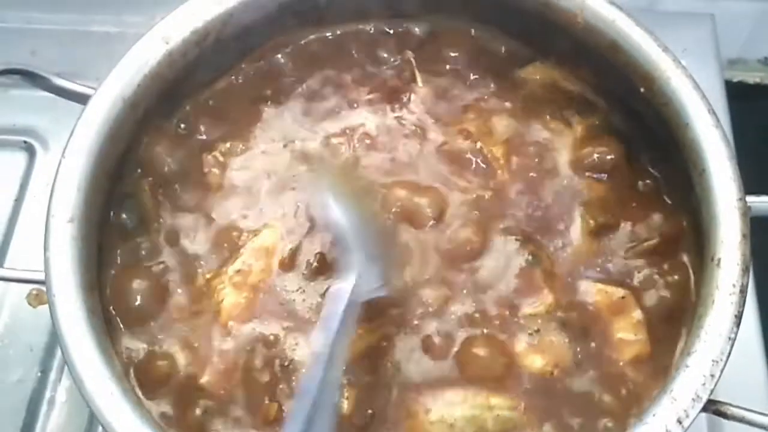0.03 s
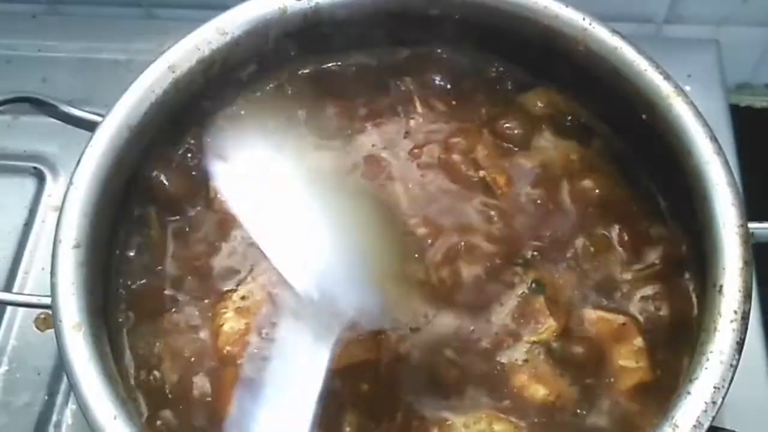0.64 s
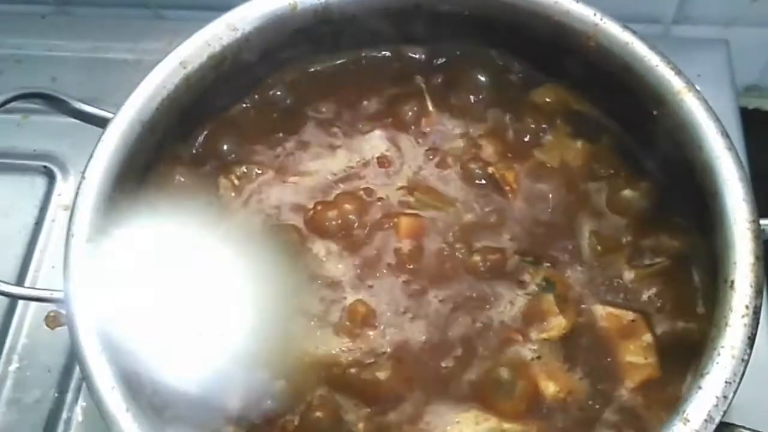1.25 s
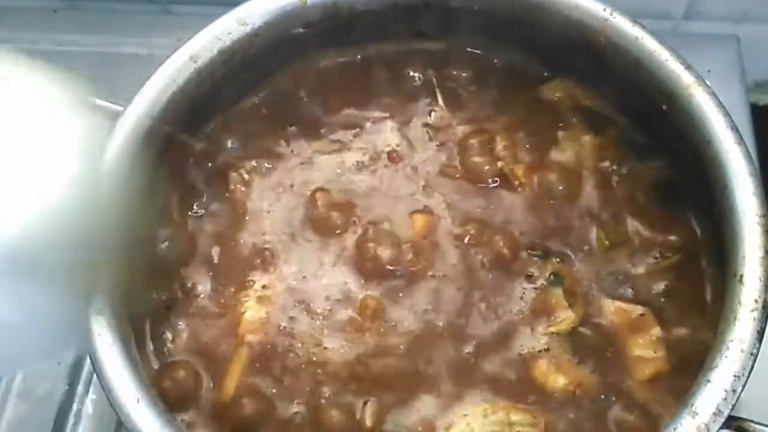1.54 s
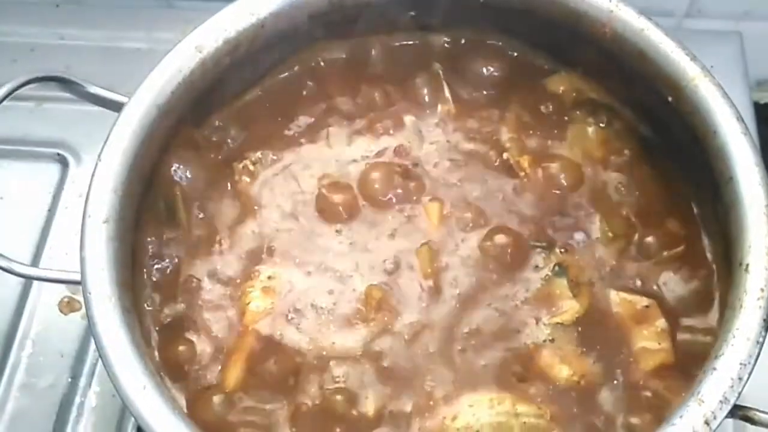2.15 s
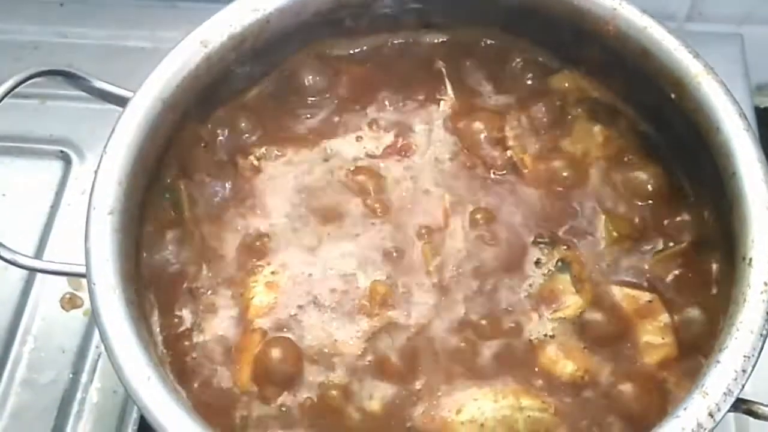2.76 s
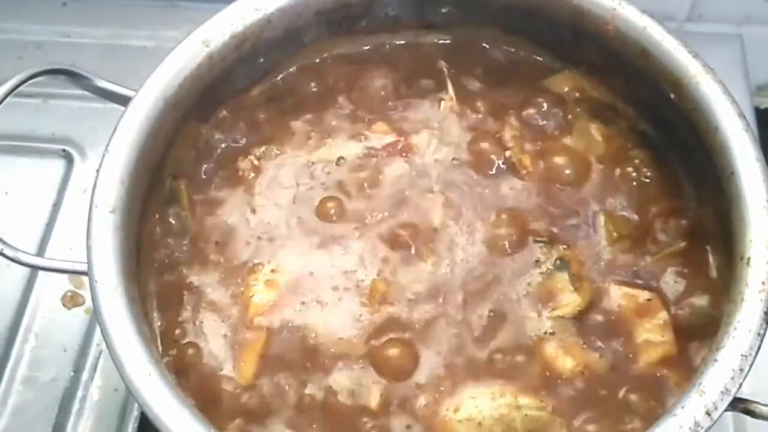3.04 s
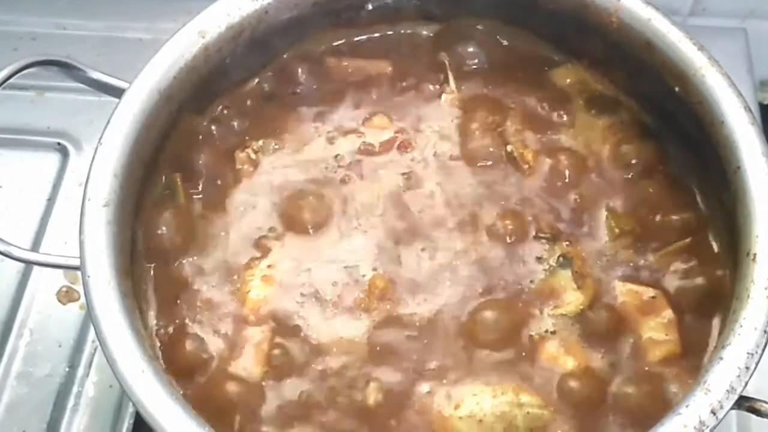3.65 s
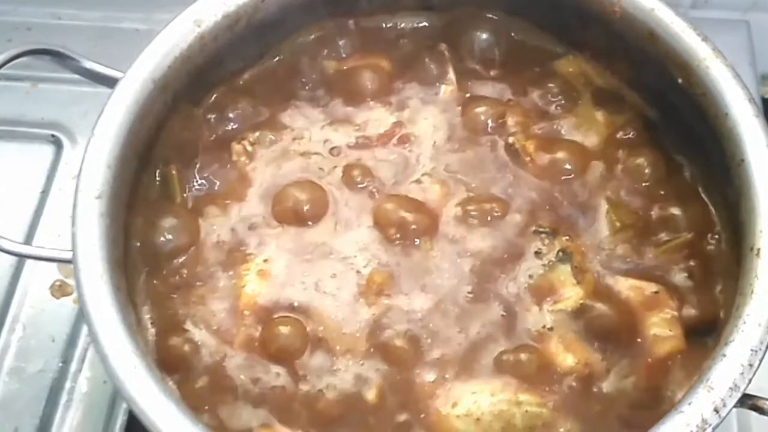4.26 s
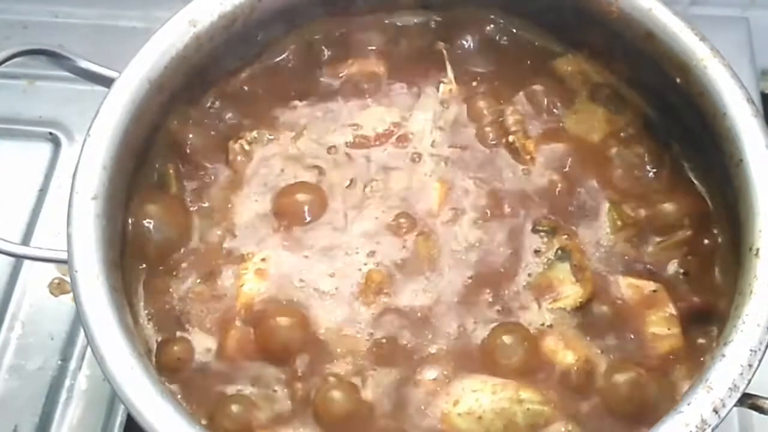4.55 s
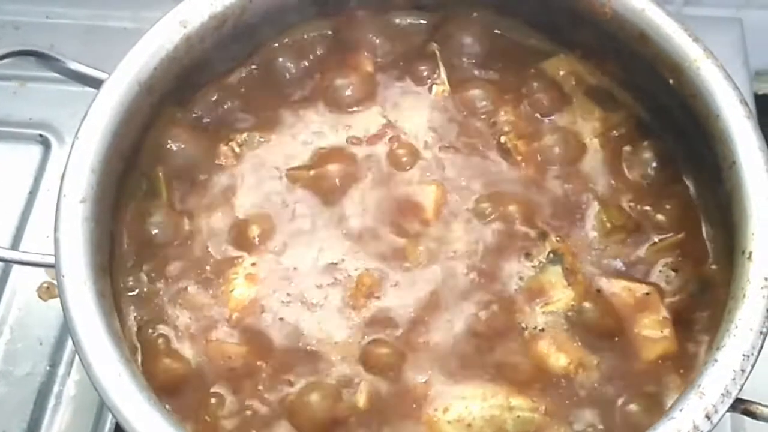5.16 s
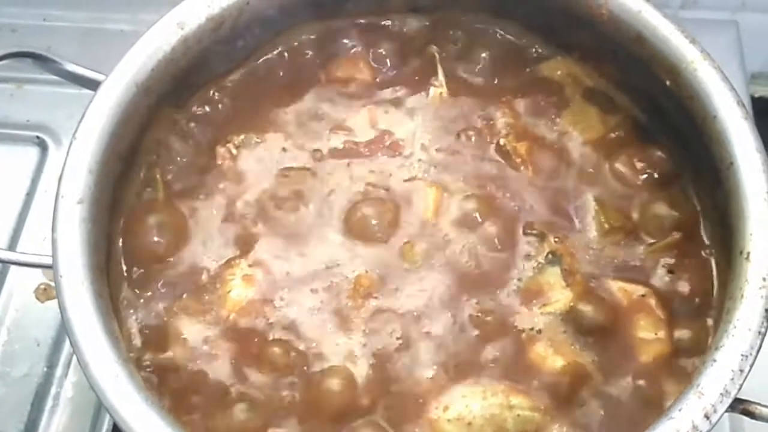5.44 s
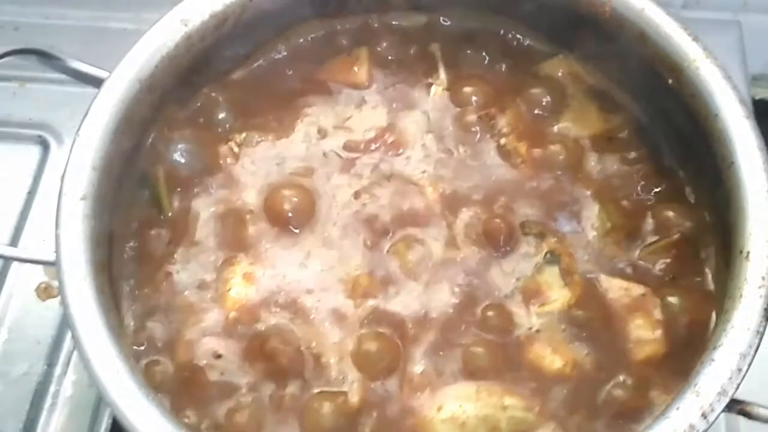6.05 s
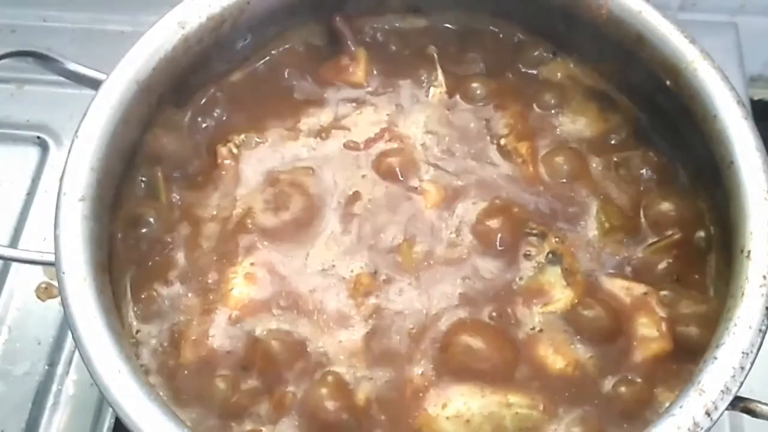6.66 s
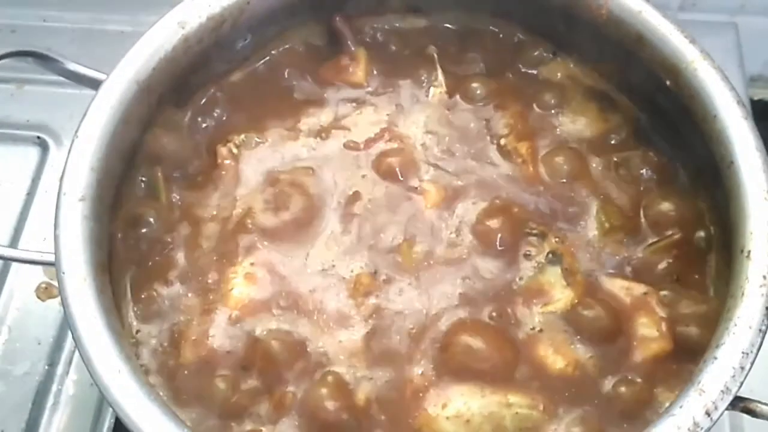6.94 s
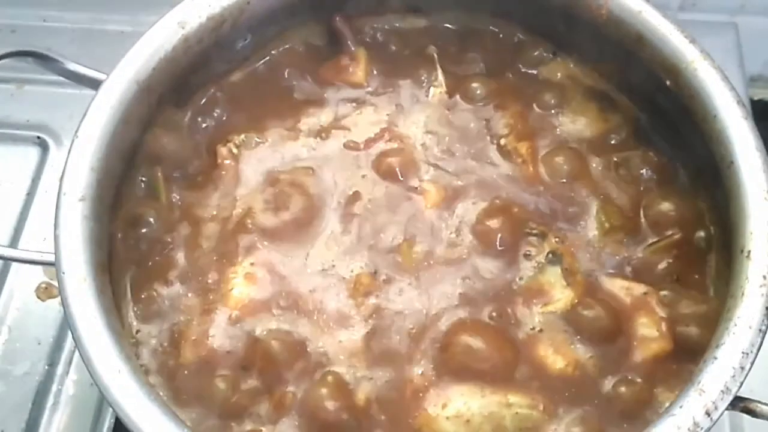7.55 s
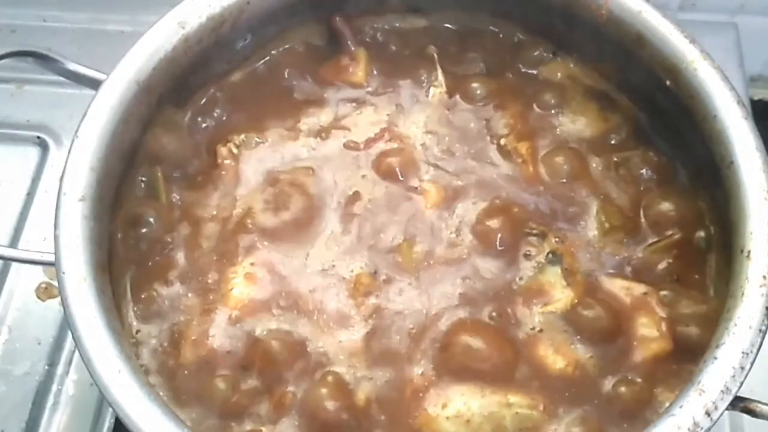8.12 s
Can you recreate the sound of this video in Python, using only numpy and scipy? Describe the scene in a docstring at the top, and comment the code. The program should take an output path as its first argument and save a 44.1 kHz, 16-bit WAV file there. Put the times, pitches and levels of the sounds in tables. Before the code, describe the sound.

A thick curry boils hard in a steel pot, heard close above the rim in a small kitchen with a short room echo. From start to finish, about eight seconds, bubbles burst irregularly, several a second, with dry snaps, short plops and wet splutters. Beneath them are fine foam fizz, soft gurgling, a low wavering hum and the quiet rush of the stove. Stronger pops stand out at about 0.3, 4.5, 5 and 6 seconds. Soft deep glugs heave through the sauce, most clearly around 3 to 3.6 and at 5.5 seconds. From about 5.5 seconds, short hissing spits of steam come more often and faintly ring the steel, building to a violent double splutter with a deep glug at 7 seconds. The boiling carries on, with a loud pop at 8 seconds and one last brief spit.

```python
"""Thick curry boiling in a steel pot

Heard just above the rim in a small kitchen, bubbles burst with dry snaps and short plops: the film tears,
the cavity rings and the pot wall throws it back. Wet films splutter, foam fizzes, steam pockets glug deep
down, and now and then sauce spits to steam and rings the steel. A low hum and the stove run underneath."""
import sys
import numpy as np
from scipy import signal
from scipy.fft import rfft, irfft
from scipy.io import wavfile
from scipy.ndimage import uniform_filter1d

SR = 44100
rng = np.random.default_rng(int(sys.argv[2]) if len(sys.argv) > 2 else 0)


def store_wav(level_fs):
    """Save 16-bit WAV to argv[1]."""
    pcm = np.round(np.clip(np.atleast_2d(level_fs), -1, 1) * 32767)
    wavfile.write(sys.argv[1], SR, pcm.T.astype(np.int16))


N = 365500
TIME = np.arange(N) / SR


def undb(db):
    """Decibels to gain."""
    return 10 ** (np.asarray(db) / 20)


def unit(x):
    """Scale to rms 1."""
    return x / np.sqrt(np.mean(x ** 2) + 1e-18)


def add(out, s, x):
    """Mix x into out from time s on."""
    i = int(np.clip(s * SR, 0, N - 1))
    out[i:i + len(x)] += x[:N - i]


def on_log_axis(points, hz):
    """Read (Hz, value) points at the given frequencies."""
    point_hz, value = np.transpose(points)
    return np.interp(np.log(np.maximum(hz, 1)), np.log(point_hz), value)


def colour(x, points):
    """Equalise x with a curve of (Hz, dB) points."""
    hz = np.fft.rfftfreq(len(x), 1 / SR)
    return irfft(rfft(x) * undb(on_log_axis(points, hz)), len(x))


def band(x, hz, width_hz, order=1):
    """Band-pass around a centre frequency."""
    low = np.hypot(hz, width_hz / 2) - width_hz / 2
    edges = [low, min(low + width_hz, SR / 2 - 1000)]
    return signal.sosfilt(signal.butter(order, edges, "band", fs=SR, output="sos"), x)


def walk(rate_hz):
    """Smooth random wander, rms 1."""
    hold = int(SR / rate_hz)
    steps = np.repeat(rng.standard_normal(N // hold + 2), hold)
    return unit(uniform_filter1d(steps, hold)[:N])


def crackle(per_s, spread_db):
    """Tiny clicks at random moments, a few larger than the rest; rms 1."""
    sizes = undb(spread_db * np.minimum(rng.exponential(size=N), 5))
    return unit((rng.random(N) < per_s / SR) * sizes * rng.standard_normal(N))


def scatter(count, centre_hz, octaves):
    """Random events all through the boil: (time [s], pitch [Hz], strength [spread about 1])."""
    place, size, strength = rng.uniform(-1.1, 1, (count, 3)).T
    moments = (np.arange(count) + place) % count / count * N / SR
    pitches = centre_hz * 2 ** (np.sqrt(3) * octaves * size)
    return np.transpose([moments, pitches, np.sqrt(3) * strength])


def ring(hz, swell_s, glide):
    """A gas cavity swells, rings and dies away while its pitch rises."""
    age = np.arange(int(9 * swell_s * SR) + 2) / (swell_s * SR)
    pitch = hz * (1 + glide * np.tanh((age - 1.3) / 2))
    envelope = (age * np.exp(1 - age)) ** 1.5
    return envelope * np.sin(2 * np.pi * np.cumsum(pitch) / SR)


def burst(hz, cycles, glide, rough, snap_db=0, echo=0.34, film_db=-18):
    """One bubble: the film snaps, the widening hole lifts the pitch, sauce and pot wall scatter it."""
    tone = ring(hz, swell_s=0.45 * cycles / hz, glide=glide * np.sqrt(min(hz / 2500, 1)))
    t = np.arange(len(tone)) / SR
    flap, snap = (np.resize(noise, len(t)) for noise in rng.standard_normal((2, SR // 50)))
    # the torn film flaps, which roughens the tone
    period = int(SR / hz)
    flap = uniform_filter1d(uniform_filter1d(flap, period), period)
    tone = tone * (1 + rough * unit(flap)) / np.hypot(1, rough)
    snap_gain = undb(film_db + snap_db) * (hz / 3000) ** 2.5
    snap_envelope = (1 - np.exp(-t / 0.0012)) * np.exp(-t / 0.0035)
    tone = tone + snap_gain * snap_envelope * snap
    # every spot on the surface has its own paths to the wall and back
    lags_s = np.r_[0, rng.uniform(0.001, 0.0022), rng.uniform(0.002, 0.018, size=7)]
    gains = np.r_[1, 0.42, echo * rng.standard_normal(7) * np.exp(-lags_s[2:] / 0.014)]
    out = np.zeros(len(t) + int(lags_s.max() * SR))
    for lag_s, gain in zip(lags_s, gains):
        add(out, lag_s, gain * tone)
    return out


def clumps(count, centre_hz, octaves, cycles, spread_db, clump_s, rough=0.99, per_clump=3):
    """Clumps of small bubbles of like size tear open one after another, all over the surface; rms 1."""
    out = np.zeros(N)
    moments = (np.arange(count) + rng.uniform(-1, 1, count)) % count / count * N / SR
    for s, strength, pitch in zip(moments, rng.exponential(size=count), rng.standard_normal(count)):
        gain = undb(spread_db * min(strength, 1.8))
        for lag, detune, share in rng.random((per_clump, 3)):
            hz = np.clip(centre_hz * 2 ** (octaves * pitch + (detune - 0.5) / 2), 230, 6300)
            bubble = burst(hz, cycles * (0.5 + share), glide=0.05, rough=rough)
            add(out, s + lag * clump_s, gain * share * bubble)
    return unit(out)


def pot_air(x, ring_db, null_hz=2150, null_width_hz=200):
    """The air standing in the pot rings at a few pitches and cancels at one between them."""
    # resonances between sauce and rim: (pitch [Hz], width [Hz], relative level [dB])
    air_modes = [(915, 123, 4), (1810, 67, 3), (2430, 90, 6), (2920, 83, 7)]
    x = x - band(x, null_hz, null_width_hz)
    return x + sum(undb(ring_db + db) * band(x, hz, width_hz) for hz, width_hz, db in air_modes)


def kitchen(x, early_db=-14, late_db=-11):
    """Quick reflections from the hob and tiles, then the room's short tail."""
    # reverb tail: (frequency [Hz], time to fall 60 dB [s])
    decay_times = [(300, 0.37), (1000, 0.36), (3000, 0.06), (10000, 0.22)]
    t = TIME[:SR // 2]
    early = rng.standard_normal(len(t)) * (t > 0.004) * np.exp(-t / 0.006)
    late = np.zeros(len(t))
    for hz in 125 * 2.0 ** np.arange(8):
        octave = band(rng.standard_normal(len(t)), hz, hz / np.sqrt(2), order=2)
        late += octave * (t > 0.009) * np.exp(-np.log(1000) * t / on_log_axis(decay_times, hz))
    response = (undb(early_db) * unit(early) + undb(late_db) * unit(late)) / np.sqrt(len(t))
    return x + signal.fftconvolve(x, response)[:N]


def stove(db=-44, swell_db=2):
    """The low rush of the stove, gently swelling."""
    # tone of the rush: (frequency [Hz], relative level [dB])
    rush_spectrum = [(22, -14), (45, -10), (64, -25), (90, 8), (115, 4), (145, 7), (190, 2.5), (430, -5.5),
                     (620, -8.5), (930, -6), (2700, -12.5), (3400, -15), (6000, -25), (7500, -53)]
    rush = unit(colour(rng.standard_normal(N), rush_spectrum))
    return rush * undb(db + swell_db * walk(5.9))


def hum(waver_db=10, drift=0.01975):
    """A bed of low tones that waver in level and pitch."""
    # hum tones: (centre pitch [Hz], centre level [dB])
    tones = [(48, -56), (82, -53.5), (145, -46.5)]
    out = np.zeros(N)
    for hz, db in tones:
        phase = 2 * np.pi * np.cumsum(hz * (1 + drift * walk(15))) / SR
        level_db = db + waver_db * np.tanh(walk(13))
        out += np.sqrt(2) * undb(level_db) * np.sin(phase)
    return out


def glugs(gain_db=-1, small_db=-32, spread_db=2, overtone_ratio=1.662, overtone_db=-13, swell_cycles=3.45):
    """Steam pockets boom softly through the thick sauce; the deeper the pitch, the slower the swell."""
    # big pockets heaving under the sauce: (time [s], level [dB], pitch [Hz])
    big_pockets = [(1.063, -28.5, 143), (1.296, -27.5, 143), (1.62, -29, 142), (2.817, -21, 145),
                   (2.962, -20.5, 142.4), (3.179, -24, 141), (3.624, -17, 147.4), (3.793, -24.5, 150),
                   (4.33, -25, 142), (4.72, -33, 149), (5.55, -20.5, 142), (5.561, -22, 80.8),
                   (5.952, -27.5, 136), (7.001, -14, 155), (7.074, -26, 139), (7.199, -21.5, 139)]
    small_pockets = [(s, small_db + spread_db * strength, hz)
                     for s, hz, strength in scatter(count=24, centre_hz=145.5, octaves=0.064)]
    out = np.zeros(N)
    for s, db, hz in big_pockets + small_pockets:
        for mode_hz, mode_db in (hz, 0), (hz * overtone_ratio, overtone_db):
            boom = ring(mode_hz, swell_cycles / mode_hz, glide=0.012)
            add(out, s, undb(db + gain_db + mode_db) * boom)
    return out


def fizz(db, tick_db=-14, pinhead_db=-6, surge_db=9):
    """Foam crackles finely, and clumps of pinhead bubbles tick open, each at its own pitch."""
    # tone of the foam's crackle: (frequency [Hz], relative level [dB])
    foam_spectrum = [(1500, -39), (2800, -23.5), (4500, -4), (7300, -16), (10000, -11.5), (12500, -48)]
    ticks = crackle(per_s=260, spread_db=4) * undb(surge_db * np.tanh(walk(20)))
    ticks = unit(colour(ticks, foam_spectrum))
    pinheads = clumps(190, centre_hz=4100, octaves=0.3, cycles=8, spread_db=5, clump_s=0.02, rough=0.45)
    return undb(db) * (undb(tick_db) * ticks + undb(pinhead_db) * pinheads)


def simmer(db, blubber_db=-1.5, gurgle_db=1, ring_db=3):
    """Crowds of small bubbles: soft deep blubbering, with short wet gurgles ringing in the pot."""
    blubber = clumps(330, centre_hz=408, octaves=0.407, cycles=3.7, spread_db=-2, clump_s=0.04)
    gurgles = clumps(290, centre_hz=1450, octaves=0.48, cycles=5, spread_db=2.5, clump_s=0.035, rough=0.6)
    gurgles = unit(pot_air(gurgles, ring_db))
    return undb(db) * (undb(blubber_db) * blubber + undb(gurgle_db) * gurgles)


def spit_cues():
    """Spits, tones, blasts: (time [s], level [dB], centre [Hz], width [Hz], rise [s], hold [s], decay [s])."""
    # broad spits of steam: (time [s], level [dB], centre [Hz], rise [s], hold [s])
    hisses = [(1.203, -43, 3030, 0.013, 0.017), (3.809, -37.5, 3120, 0.0014, 0.12),
              (5.523, -40.5, 4740, .016, 0.075), (5.813, -34, 3600, 0.0019, 0.073),
              (6.526, -34.5, 4700, 0.042, 0.057), (6.662, -21, 3800, 0.0018, 0.026),
              (6.857, -21, 2560, 0.0027, 0.011), (7.11, -35, 4220, 0.0055, 0.076),
              (7.855, -28, 4460, 0.0022, 0.013), (8.225, -24.5, 3960, 0.023, 0.034)]
    # brief narrow tones, high steam whistles and low ringing notes of the pot:
    # (time [s], level [dB], pitch [Hz], hold [s])
    brief_tones = [(2.497, -34, 910, 0.058), (2.755, -32.5, 2050, 0.0069), (5.88, -40, 6050, 0.028),
                   (6.565, -31, 4770, 0.031), (6.665, -22.5, 3490, 0.034), (6.862, -20.5, 687, 0.03),
                   (6.88, -25, 422, 0.013), (7.051, -23, 359, 0.035), (7.85, -29.5, 3230, 0.024),
                   (8.255, -30.5, 4030, .03)]
    # one violent splutter in two blasts: (time [s], level [dB])
    blasts = [(6.972, -4), (7.011, -11.5)]
    # resonances that each blast excites: (pitch [Hz], width [Hz], relative level [dB], decay [s])
    blast_modes = [(357, 180, -16.5, 0.033), (690, 300, -22, 0.041), (2176, 1200, -2.5, 0.029),
                   (3720, 1330, -7.5, 0.03)]
    broad = [(s, db, hz, 0.93 * hz, rise_s, hold_s, 0.04) for s, db, hz, rise_s, hold_s in hisses]
    narrow = [(s, db, hz, 0.1 * hz, 0.0021, hold_s, 0.017) for s, db, hz, hold_s in brief_tones]
    violent = [(s, db + mode_db, hz, width_hz, 0.0018, 0.0098, decay_s)
               for s, db in blasts for hz, width_hz, mode_db, decay_s in blast_modes]
    return broad + narrow + violent


def steel_ring(x, ring_db=-11, t60_s=0.12):
    """The pot's steel wall rings briefly along with x."""
    # modes of the wall: (pitch [Hz], relative level [dB])
    wall_modes = [(1815, -13), (1987, -8), (2051, 6), (2209, -2), (2280, -5.5), (2350, 0), (2402, 2),
                  (2454, -6), (2495, 18), (2597, 5.5), (3652, -20), (3771, 0)]
    t = TIME[:SR // 2]
    wall = sum(undb(db) * np.sin(2 * np.pi * hz * t) for hz, db in wall_modes)
    wall *= np.exp(-np.log(1000) * t / t60_s)
    return x + undb(ring_db) * np.std(x) * unit(signal.fftconvolve(x, wall)[:N])


def spits(spray_db=-10, cluster_mix=0.8, cluster_ring_s=0.003):
    """Sauce flashes to steam: a dense volley of micro-bursts and a broad spray set the steel ringing."""
    # tone of the spray: (frequency [Hz], relative level [dB])
    spray_spectrum = [(200, 4), (700, 26), (1100, 14), (2200, 24), (6300, 32), (7400, 22), (12500, 22)]
    out, t = np.zeros(N), TIME[:SR // 2]
    volley = crackle(per_s=2600, spread_db=1.5) * undb(1.8 * walk(190))
    spray = unit(colour(volley, spray_spectrum))
    for s, db, hz, width_hz, rise_s, hold_s, decay_s in spit_cues():
        part = slice(int(s * SR) - len(t), int(s * SR))
        envelope = (1 - np.exp(-t / rise_s)) * np.exp(-np.maximum(t - hold_s, 0) / decay_s)
        voice = unit(band(volley, hz, width_hz, order=2)[part])
        voice += undb(spray_db) * hz / 3000 * spray[part]
        # each cue has its own cluster of short resonances
        cluster = rng.standard_normal(len(t)) * np.exp(-t / cluster_ring_s)
        voice += cluster_mix * signal.fftconvolve(voice, cluster / np.linalg.norm(cluster))[:len(t)]
        add(out, s, undb(db) * unit(voice * envelope) * np.sqrt(np.mean(envelope ** 2)))
    return steel_ring(out)


def splutters(steps=7, octaves=0.18, spread_db=4.5, ring_db=-7):
    """A thick film rips open in a ragged run of short bursts, each with its own pitch and strength."""
    # wet rips: (time [s], level [dB], centre pitch [Hz], length [s])
    rips = [(.001, -26.5, 2010, 0.0096), (0.591, -33, 3440, 0.012), (0.762, -32, 4720, 0.0085),
            (0.807, -32.5, 1950, 0.041), (1.033, -30, 1610, 0.022), (1.111, -36, 1720, 0.018),
            (1.235, -30.5, 3380, 0.012), (1.261, -31, 2660, 0.021), (1.531, -26, 3200, 0.011),
            (1.809, -30.5, 2630, 0.028), (2.27, -34.5, 2700, 0.027), (2.63, -32, 1500, 0.017),
            (2.992, -27.5, 3680, 0.0094), (3.141, -30, 1640, 0.026), (3.521, -34, 1660, 0.032),
            (3.856, -34.5, 2660, 0.022), (4.042, -36.5, 2410, 0.026), (4.152, -39.5, 3570, 0.026),
            (4.471, -36, 1880, 0.01), (4.653, -33, 1920, 0.021), (4.808, -33.5, 2380, 0.0093),
            (5.125, -34, 2490, 0.014), (5.24, -34.5, 4270, 0.02), (5.333, -34.5, 1830, 0.019),
            (5.406, -30.5, 1646, 0.026), (6.075, -33.5, 1196, 0.013), (6.118, -34.5, 3020, 0.024),
            (6.142, -31.5, 1127, 0.0087), (6.314, -38.5, 1800, 0.04), (6.372, -38.5, 2220, 0.026),
            (6.59, -27, 2400, 0.013), (8.166, -31, 1980, 0.015), (8.18, -33.5, 3430, 0.0079)]
    out = np.zeros(N)
    for s, db, hz, length_s in rips:
        run = np.zeros(SR // 5)
        for step, (slip, size, strength) in enumerate(rng.uniform(-0.91, 1, (steps, 3)) * np.sqrt(3)):
            tear = burst(hz * 2 ** (octaves * size), cycles=6, glide=0.035, rough=1, snap_db=-3)
            add(run, length_s * (step + slip / 2) / steps, undb(spread_db * strength) * tear)
        add(out, s, undb(db) * run * np.sqrt(length_s * SR / np.sum(run ** 2)))
    return pot_air(out, ring_db)


def pops(gain_db=1, shred_db=-18, shreds=4, small_db=-30, spread_db=2, ring_db=-6):
    """Big bubbles burst one by one amid higher snapping shreds of film; weaker ones pop at random."""
    # the loudest surface bubbles: (time [s], level [dB], cavity pitch [Hz], relative film snap [dB])
    big_bubbles = [(0.101, -20.5, 3240, 4), (0.144, -15, 1830, -6), (0.3028, -12.5, 1830, -3),
                   (0.3056, -6, 2750, -13), (.456, -22.5, 2360, -13), (0.6389, -16, 4050, 1),
                   (0.682, -22, 1693, -3), (.7058, -19.5, 2710, 5), (.765, -29.5, 5270, -10),
                   (0.8225, -16, 2890, -1), (.9449, -25.5, 4030, 3), (1.2617, -20, 1760, 1),
                   (1.507, -15.5, 3670, -9), (1.591, -26, 1300, -2), (1.628, -25.5, 2530, 9),
                   (1.726, -22.5, 3070, -3), (1.749, -19, 1870, 2), (1.936, -25, 2450, -8),
                   (1.966, -23.5, 930, 6), (2.032, -24, 1360, -2), (2.0557, -21.5, 5080, -2),
                   (2.2236, -24, 3780, 5), (2.3387, -15.5, 4210, -3), (2.386, -19, 4920, -4),
                   (2.5681, -15.5, 2650, 8), (2.6586, -23.5, 2980, 9), (2.8738, -17, 2570, 3.5),
                   (2.9772, -23.5, 1870, 0), (3.028, -13, 2850, 1.5), (3.164, -18, 1780, -2),
                   (3.42, -24.5, 980, 5), (3.5328, -21.5, 1380, 0), (3.579, -13, 2700, -3),
                   (3.7967, -19, 1176, 0), (3.968, -22, 3430, 3), (4.2617, -19, 1580, -7),
                   (4.321, -25, 4820, -0.5), (4.4653, -16, 1433, 13), (4.4785, -11, 1900, -5),
                   (4.5095, -7.5, 2185, -27), (4.552, -18, 1470, -1), (4.655, -22.5, 1860, 0),
                   (4.6885, -23, 5720, -4.5), (4.9177, -23, 3140, -3), (4.962, -21.5, 2270, -6),
                   (4.9983, -8.5, 2250, -20), (5.002, -8, 2544, -25), (5.138, -24, 4700, -1),
                   (5.2505, -14, 4300, -8), (5.3166, -21, 1600, -4), (5.523, -18.5, 1660, 4),
                   (5.61, -24.5, 5500, -2), (5.8863, -15, 3600, 2), (5.9373, -21, 4650, -4),
                   (6.023, -16.5, 2650, -9), (6.026, -7, 3650, -16), (6.1867, -9.5, 3260, -2),
                   (6.209, -23, 2680, 4), (6.624, -20.5, 950, 6), (6.776, -18.5, 3020, 1),
                   (6.81, -22, 1830, 14), (6.911, -13.5, 1860, 1), (7.189, -24.5, 2270, 12),
                   (7.483, -26.5, 1740, -18), (7.5235, -17, 2400, -8), (7.623, -25, 1130, 18),
                   (7.753, -29, 3960, 4.5), (7.793, -26, 1880, 2), (7.8112, -17, 2420, -2),
                   (7.8557, -19, 3220, 9), (7.842, -23, 1800, 6), (8.009, -4, 1974, -14)]
    base_length_s, doubling_db = 0.0019, 22  # a harder burst is over sooner
    out = np.zeros(N)
    for s, db, hz, snap_db in big_bubbles:
        cycles = hz * base_length_s * 2 ** (-db / doubling_db)
        # a clean tear chirps upwards, a ragged one mostly splats
        ragged = rng.uniform(-0.5, 0.8)
        glide, rough = 0.21 * (1 - ragged), 0.56 * (1 + ragged)
        add(out, s, undb(db + gain_db) * burst(hz, cycles, glide, rough, snap_db, echo=0.068))
        for lag_s, octaves in zip(rng.uniform(-0.008, 0.012, shreds), rng.uniform(0, 1, shreds)):
            shred = burst(min(hz * 2 ** octaves, 6000), cycles=5, glide=0, rough=0.8)
            add(out, s + lag_s, undb(db + shred_db + snap_db / 2) * shred)
    for s, hz, strength in scatter(count=36, centre_hz=1950, octaves=0.52):
        blip = burst(hz, cycles=6, glide=0.06, rough=0.5)
        add(out, s, undb(small_db + spread_db * strength) * blip)
    return pot_air(out, ring_db)


def scene(simmer_db=2, side_db=-10):
    """The pot sits in the middle; only the finest treble spreads to the sides."""
    # faders of the rolling boil: (time [s], small bubbles [dB], fizz [dB])
    boil_levels = [(0, -44, -46), (2.3, -44.5, -46), (2.6, -45, -50), (5.4, -45, -50), (5.8, -45, -45),
                   (6.7, -42, -43), (7.4, -46, -50), (8.29, -44, -47)]
    times, *levels = np.transpose(boil_levels)
    bubbles_db, foam_db = (np.interp(TIME, times, db) for db in levels)
    surface = pops() + splutters() + simmer(bubbles_db + simmer_db) + fizz(foam_db) + spits()
    pot = kitchen(surface)
    mid = pot + glugs() + hum() + stove()
    paths = rng.standard_normal(SR // 250)
    diffuse = signal.fftconvolve(pot, paths / np.linalg.norm(paths))[:N]
    side = undb(side_db) * band(diffuse, hz=8200, width_hz=10500, order=5)
    return np.array([mid + side, mid - side])


def record(dry, ceiling=0.9, mono_below_hz=3800, top_hz=13100):
    """The microphone colours the treble, rounds peaks, keeps all but the treble mono and cuts the top."""
    # the microphone's colour: (frequency [Hz], gain [dB])
    microphone_eq = [(1000, -1), (3000, 1.5), (6300, 3.5), (7400, -1.5), (12500, -1.5)]
    heard = np.array([colour(channel, microphone_eq) for channel in dry])
    left, right = heard / (1 + (heard / ceiling) ** 6) ** (1 / 6)
    high_pass = signal.butter(6, mono_below_hz, "high", fs=SR, output="sos")
    mid = (left + right) / 2
    side = signal.sosfiltfilt(high_pass, (left - right) / 2)
    low_pass = signal.firwin(201, top_hz, window="blackman", fs=SR)
    return signal.fftconvolve(np.array([mid + side, mid - side]), low_pass[None], mode="same", axes=1)


dry = scene()
out = record(dry)
store_wav(out)
```